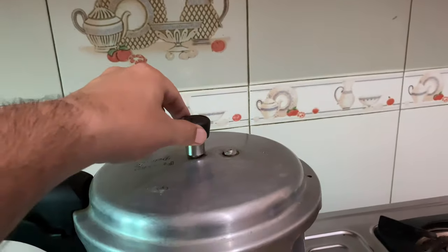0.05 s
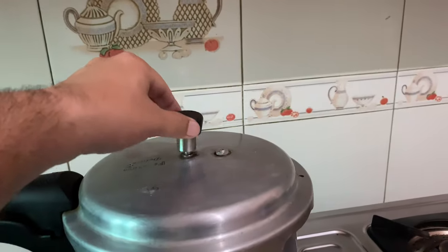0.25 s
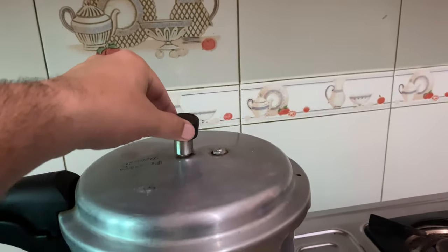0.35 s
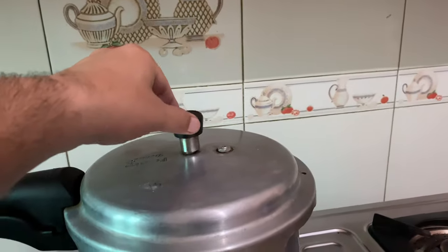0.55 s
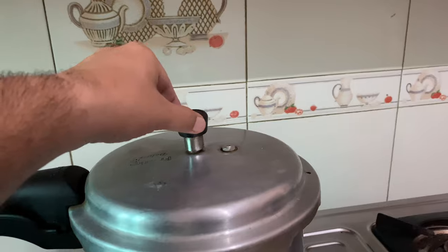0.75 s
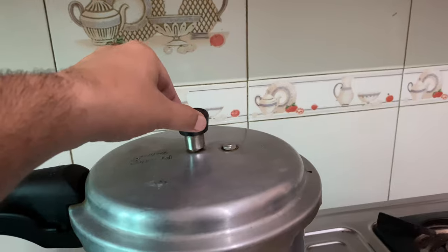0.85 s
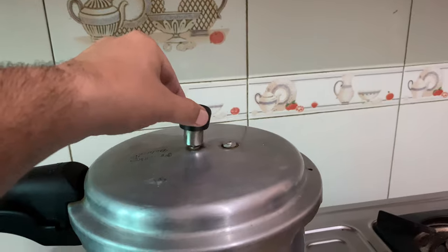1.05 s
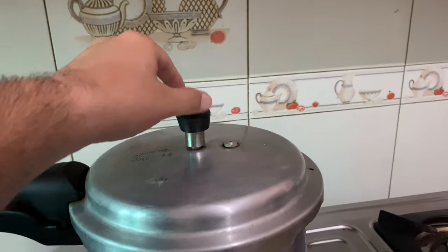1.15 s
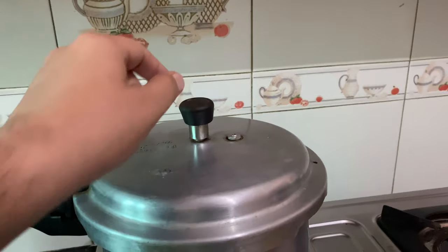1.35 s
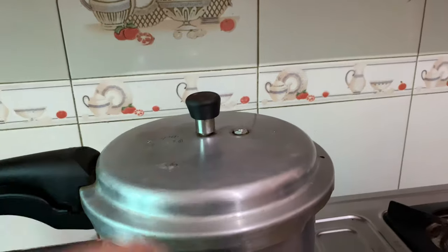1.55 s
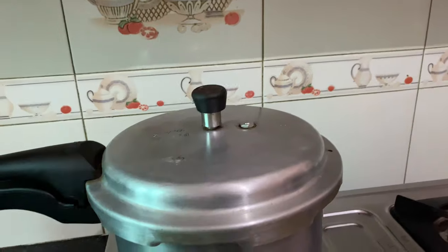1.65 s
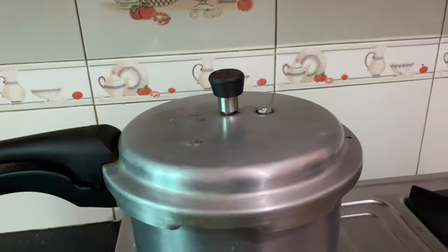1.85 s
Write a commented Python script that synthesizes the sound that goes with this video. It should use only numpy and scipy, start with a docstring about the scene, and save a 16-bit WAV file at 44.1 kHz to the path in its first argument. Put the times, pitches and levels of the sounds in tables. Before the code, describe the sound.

A pressure cooker hisses steam in three short bursts, close by in a small tiled kitchen. After a light metal tick at 0.1 seconds, the bursts come at about 0.2 to 0.4, 0.65 to 0.8 and 0.95 to 1.15 seconds, the loose weight chattering on its pipe. It drops back with a clinking knock near 1.2 seconds. Soft room tone remains, with a faint low hum from 1.7 seconds.

```python
"""A light metal tick, then three short bursts of steam: a hand lifts the weight of a pressure cooker.
The jet from the vent hisses over a lower roar, while the loose weight chatters on its pipe and drops
back with a knock that rings lid and pot. A small tiled kitchen answers briefly over soft room tone,
and a faint hum swells at the end. Two microphone ports on a handheld body hear it close by."""
import sys
import numpy as np
from scipy import signal
from scipy.fft import rfft, irfft, next_fast_len
from scipy.io import wavfile
from scipy.ndimage import uniform_filter1d

SR = 44100
rng = np.random.default_rng(int(sys.argv[2]) if len(sys.argv) > 2 else 0)


def transcribe(u):
    """Save the signal u as a 16-bit wav file named by the first command-line argument.

    u: samples, shape (n,) or (channels, n), limited to [-1, 1]; the rate is SR.
    q: integer samples, one column per channel.
    """
    v = np.clip(np.atleast_2d(u).T, -1, 1)
    q = np.round(v * 32767).astype(np.int16)
    wavfile.write(sys.argv[1], SR, q)


N = 83790

# Colour of the room tone and of the reverb. Each row: frequency in Hz, relative level in dB.
AIR_EQ = [(40, -25), (80, -4.5), (125, -4.5), (190, -12), (300, -12.5), (500, -20.5), (1110, -18),
          (2400, -23), (5700, -37), (13500, -41.5), (15000, -71)]
REVERB_EQ = [(200, 6.5), (500, 3), (1000, -10), (1500, 1.5), (3000, -4.5), (5000, -4), (7000, -4),
             (9000, -8), (13000, -15.5), (16000, -32.5)]
# Decay of the tiled room. Each row: frequency in Hz, seconds to fall 60 dB.
REVERB_DECAY = [(200, 0.57), (600, 0.52), (2000, 0.43), (8000, 0.36), (14000, 0.44)]
# How mono the room sounds. Each row: frequency in Hz, left-right correlation from 0 to 1.
ROOM_LIKENESS = [(30, 0.2), (100, 1), (300, 0.89), (600, 0.33), (1500, 0)]
# The hum's late swell. Each row: time in seconds, level in dB.
HUM_SWELL = [(1.6, -75), (1.68, -58), (1.85, -58), (1.9, -60)]
# Phase between the ports. Each row: frequency in Hz, lead of the left port in radians.
PORT_LEAD = [(0, 0), (1200, 1.2), (1500, 3.1), (2400, 6.8), (2800, 9.4), (3300, 10.2), (4200, 12.2),
             (4700, 15.7), (5300, 17), (6400, 18.8), (8000, 17.6), (8500, 15.7), (11800, 9.4),
             (15000, 3.14)]
# Balance between the ports. Each row: frequency in Hz, left minus right in dB.
PORT_BALANCE = [(300, -2), (900, 5), (1400, -0.5), (2400, -2.5), (3600, 4), (5500, -5.5), (7000, -9),
                (8100, 10), (9000, -0.5)]
# Ringing metal; the clink is the weight's high modes.
# Each row: frequency in Hz, relative level in dB, seconds to fall 60 dB.
LID_MODES = [(721, -10, 0.048), (837, -3.5, 0.013), (972, 5, 0.018), (1370, 5, 0.0078), (1694, -2, 0.02),
             (2260, -1.5, 0.0099), (2750, 1.5, .006)]
WEIGHT_MODES = [(3475, 7, 0.0089), (3800, -2, 0.045), (4034, -7, 0.034)]
CLINK_MODES = [(5200, -10, .005), (6000, 0.5, 0.0087), (6850, 5.5, 0.004), (8180, -3.5, 0.012),
               (9970, 0.5, 0.007), (12630, -8, 0.0024)]
POT_MODES = [(301.4, -12.5, 0.16), (430, -3.5, 0.11), (565.7, -3.5, 0.026)]
# The weight hits the pipe. Each row: start in seconds, then lid, weight, clink and pot gains in dB.
HITS = [(.093, -32, -29, -30, -40), (.0958, -26, -33, -33, -32), (.324, -24, -40, -45, -42),
        (.3845, -20, -28, -40, -29), (.392, -23, -32, -45, -29), (.4005, -18, -19, -38, -31),
        (.405, -24, -21, -45, -36), (.4125, -27, -24, -45, -34), (.431, -26, -40, -48, -36),
        (.459, -28, -28, -38, -36), (.481, -31, -38, -48, -40), (.675, -21, -34, -45, -33),
        (.7725, -16, -19, -40, -36), (.776, -15, -22, -40, -32), (.78, -19, -18, -40, -26),
        (.792, -23, -28, -45, -31), (.822, -30, -32, -46, -36), (1.05, -32, -34, -45, -40),
        (1.089, -19, -19, -24, -36), (1.0935, -16, -24, -19, -35), (1.14, -19, -26, -17, -29),
        (1.152, -23, -23, -34, -27), (1.1605, -12, -21, -16, -30), (1.1675, -15, -17, -14, -31),
        (1.1745, -23, -25, -30, -36)]
# Colour of the jet's two layers. Each row: frequency in Hz, relative level in dB.
HISS_EQ = [(3000, -26), (4300, -9), (5200, -4), (6600, -9), (8000, -4), (9050, 0), (10000, -13),
           (11200, -18), (12800, -12), (14000, -15), (15700, -17)]
ROAR_EQ = [(400, -37.5), (900, 0.5), (1250, 8), (1700, -1.5), (2400, 1.5), (3500, 7), (4300, -6),
           (5200, -18), (7000, -13.5)]
# A barely lifted weight thins the hiss. Each row: frequency in Hz, boost or cut in dB.
NARROW_GAP_EQ = [(4200, -2), (6200, -8), (8200, -3), (9400, 4), (12000, 2)]
# One list per lift. Each row: time in seconds, hiss level in dB, roar relative to the hiss in dB.
LIFTS = [
    [(.18, -47, -45.5), (.208, -32.5, -17.5), (.24, -23, -35), (.25, -18, -55), (.263, -15, -12),
     (.30, -18, -16.5), (.34, -18.5, -8.5), (.372, -18, -21), (.4, -23.5, -1.5)],
    [(.632, -52, -33.5), (.646, -41, -7), (.655, -29, -18), (.664, -26, -2), (.682, -18.5, -20),
     (.765, -22, -11), (.79, -22.5, -22.5)],
    [(.932, -49, -31), (.956, -32.5, -44), (.982, -23.5, -16), (1.03, -22.5, -19), (1.04, -24.5, -4),
     (1.065, -23, -22), (1.08, -21.5, -10.5), (1.142, -22.5, -12), (1.152, -20, 3)],
]


def amp(db):
    return 10 ** (np.asarray(db) / 20)


def unit_rms(x):
    return x / np.sqrt(np.mean(abs(x) ** 2) + 1e-20)


def curve(points, hz):
    """Read a table along a log frequency axis."""
    f, value = np.transpose(points)
    return np.interp(np.log(hz + 1), np.log(f + 1), value)


def noise_field(size, patch_bins=1, patch_frames=1):
    """Two noise spectrograms, their frequencies and a pattern of drifting patches."""
    a, b, c, d, patches = rng.standard_normal((N * 4 // size + 5, size // 2 + 1, 5)).T
    patches = uniform_filter1d(uniform_filter1d(patches, patch_bins, 0), patch_frames, 1)
    return a + 1j * b, c + 1j * d, np.fft.rfftfreq(size, 1 / SR), unit_rms(patches)


def to_wave(spectra):
    size = 2 * (spectra.shape[-2] - 1)
    return signal.istft(spectra, nperseg=size, noverlap=size * 3 // 4)[1][..., :N]


def room_stereo(a, b, hz):
    """Blend two noises into a pair that is near mono in the bass and wide on top."""
    same = curve(ROOM_LIKENESS, hz)[:, None]
    return np.array([a, same * a + np.sqrt(1 - same ** 2) * b])


def room_tone():
    """Kitchen air: a low, gently shifting wash."""
    a, b, hz, patches = noise_field(2048, patch_bins=4, patch_frames=8)
    colour = amp(curve(AIR_EQ, hz)[:, None] - patches)
    return amp(-49.5) * unit_rms(to_wave(room_stereo(a, b, hz) * colour))


def hum(pitch_hz=125.4, waver_hz=.7):
    """A faint, slightly wavering low tone that swells late."""
    level = amp(np.interp(np.arange(N) / SR, *np.transpose(HUM_SWELL)))
    waver = waver_hz * unit_rms(uniform_filter1d(rng.standard_normal(N), size=4000))
    return level * np.sqrt(2) * np.sin(2 * np.pi * np.cumsum(pitch_hz + waver) / SR)


def kitchen_reverb(x, predelay_s=.003):
    """Tiled walls return a dense tail, each band dying at its own speed."""
    a, b, hz, _ = noise_field(256)
    t = np.arange(a.shape[1]) * 64 / SR
    t60 = curve(REVERB_DECAY, hz)[:, None]
    decay = room_stereo(a, b, hz) * amp(-60 * t / t60) / np.sqrt(t60)
    tail = to_wave(decay * amp(curve(REVERB_EQ, hz))[:, None])[:, :SR]
    tail /= np.linalg.norm(to_wave(decay)[0])
    tail = np.pad(tail, ((0, 0), (round(predelay_s * SR), 0)))
    return signal.fftconvolve(x[None], tail, axes=1)[:, :N]


def mic_ports(x):
    """The direct sound reaches the two ports with a phase and level difference."""
    size = next_fast_len(N + 4096)
    hz = np.fft.rfftfreq(size, 1 / SR)
    lead = np.interp(hz, *np.transpose(PORT_LEAD))
    left = amp(curve(PORT_BALANCE, hz) / 2) * np.exp(.5j * lead)
    return irfft(rfft(x, size) * np.array([left, 1 / left]), size)[:, :N]


def metal_ring(modes, detune=.029, spread_db=1.5):
    """Dying sines; each hit lands elsewhere, shifting their pitch and strength."""
    t = np.arange(4000)[:, None] / SR
    hz, db, t60 = np.transpose(modes)
    level_jitter, pitch_jitter = rng.standard_normal((2, len(modes)))
    envelopes = amp(db + spread_db * level_jitter - 60 * t / t60)
    tones = envelopes * np.sin(2 * np.pi * hz * (1 + detune * pitch_jitter) * t)
    return tones @ (-1.) ** np.arange(len(modes))  # neighbouring modes swing in opposite sense


def weight_chatter(scrape_s=.00092, snap=.92):
    """Each hit is a sharp contact and a short gritty slide, ringing lid, weight and pot."""
    t, out = np.arange(500) / SR, np.zeros(N)
    for start, *gains in HITS:
        for db, modes in zip(gains, (LID_MODES, WEIGHT_MODES, CLINK_MODES, POT_MODES)):
            scrape = rng.standard_normal(len(t)) * t * np.exp(-t / scrape_s)
            blow = (scrape / np.linalg.norm(scrape) + snap * (t == 0)) / np.hypot(1, snap)
            knock = amp(db) * signal.fftconvolve(blow, metal_ring(modes))
            out[round(start * SR):][:len(knock)] += knock
    return out


def steam_jet(flicker_db=3.5, open_db=-22, narrow_db=-22.5, shut_db_per_s=701):
    """A turbulent jet of hiss and lower roar; the hiss climbs as the gap narrows."""
    noise, _, hz, patches = noise_field(512, patch_bins=6, patch_frames=16)
    turbulence = noise * amp(flicker_db * patches)
    hiss_eq = curve(HISS_EQ, hz)
    colours = hiss_eq, hiss_eq + curve(NARROW_GAP_EQ, hz), curve(ROAR_EQ, hz)
    wide, thin, roar = (unit_rms(to_wave(turbulence * amp(eq)[:, None])) for eq in colours)
    t, out = np.arange(N) / SR, np.zeros(N)
    for lift in LIFTS:
        times, hiss_db, roar_db = np.transpose(lift)
        level_db = np.interp(t, times, hiss_db, left=-120)
        release_db = shut_db_per_s * np.maximum(t - times[-1], 0)
        narrowness = np.clip((level_db - open_db) / (narrow_db - open_db), 0, 1)  # quieter is thinner
        hiss = wide + narrowness * (thin - wide)
        out += amp(level_db - release_db) * (hiss + amp(np.interp(t, times, roar_db)) * roar)
    return out


def scene():
    """The cooker up close, with the kitchen behind it."""
    low_cut = signal.butter(3, 171, "high", fs=SR, output="sos")  # the small cooker radiates no bass
    cooker = signal.sosfilt(low_cut, steam_jet() + weight_chatter())
    return mic_ports(cooker) + kitchen_reverb(cooker) + room_tone() + hum()


def record(dry, threshold_db=-19, duck_share=.5, recover_db_per_s=7.5, high_cut_hz=15780):
    """Gain control ducks just after a loud peak and recovers slowly; a steep high cut follows."""
    power = uniform_filter1d((dry ** 2).mean(0), size=440)
    over_db = 10 * np.log10(abs(power) + 1e-12) - threshold_db
    recovery = np.arange(N) * recover_db_per_s / SR
    held_db = np.maximum.accumulate(duck_share * over_db + recovery) - recovery
    duck_db = uniform_filter1d(np.maximum(held_db, 0), size=881, origin=440)  # 20 ms attack
    high_cut = signal.firwin(1023, high_cut_hz, window=("kaiser", 9), fs=SR)
    return signal.oaconvolve(dry / amp(duck_db), high_cut[None], "same")


dry = scene()
out = record(dry)
transcribe(out)
```